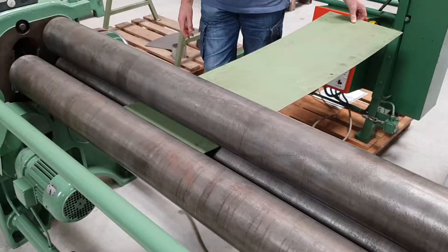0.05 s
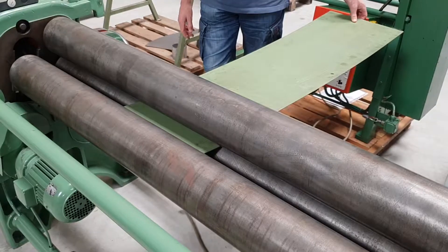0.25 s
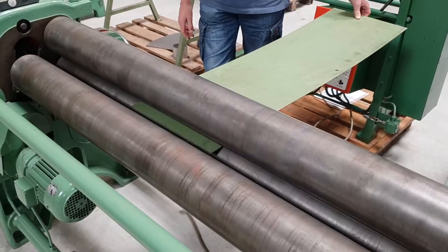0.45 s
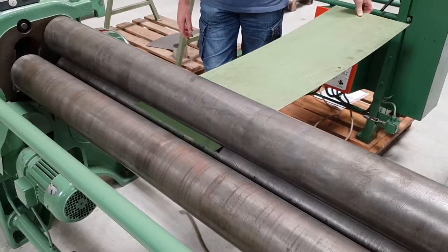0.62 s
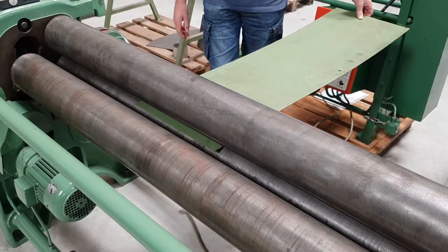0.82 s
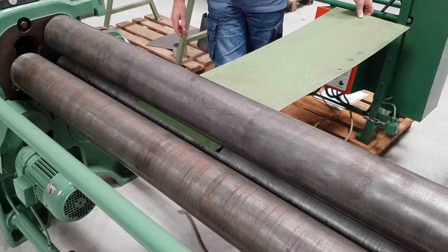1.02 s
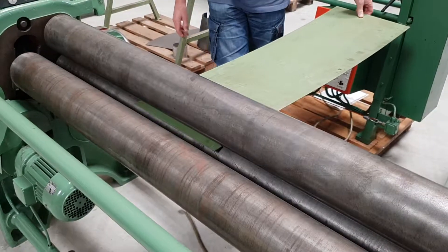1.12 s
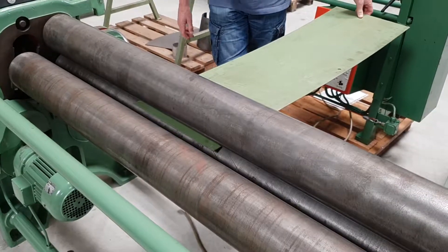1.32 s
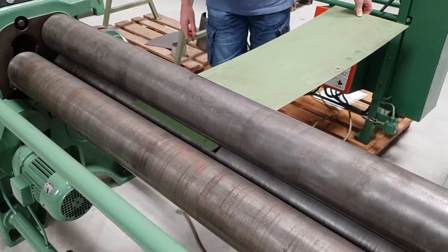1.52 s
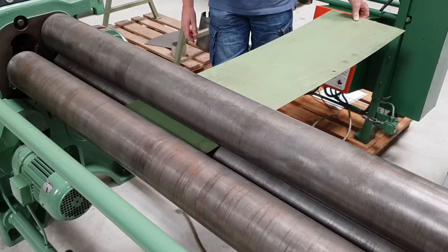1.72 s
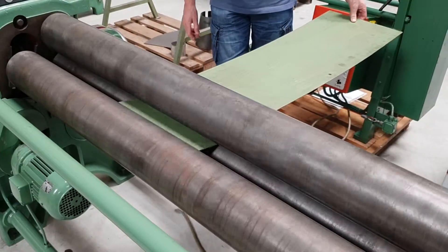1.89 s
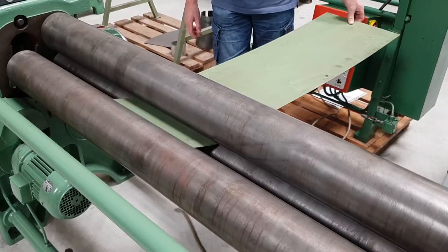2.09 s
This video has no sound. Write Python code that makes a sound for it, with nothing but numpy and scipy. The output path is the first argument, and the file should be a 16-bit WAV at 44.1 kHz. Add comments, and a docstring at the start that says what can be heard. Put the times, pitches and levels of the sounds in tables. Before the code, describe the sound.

A plate bending machine in a reverberant workshop, heard close in stereo: clack, gear rattle, short whine, hard stopping clunk with faint jingling, then an engaging clunk, high ping, motor hum and a brief plate groan.

```python
"""A steady room background, then a small clack and the gear rattle of a plate bending machine jogged in a
reverberant workshop. It whines briefly, stops with a clunk and loose parts jingle; it engages with another clunk,
thuds and a high ping, the motor hums on and the plate groans between the rolls.
Gears, clacks and clunks are shaped noise; steel, whine and hum are sines whose phase wanders.
Each source reaches two channels as direct sound, a ceiling echo and reverberation made from decaying noise."""
import sys
import numpy as np
from scipy import signal
from scipy.fft import rfft, irfft, next_fast_len
from scipy.io import wavfile
from scipy.ndimage import map_coordinates

SR = 44100
rng = np.random.default_rng(int(sys.argv[2]) if len(sys.argv) > 2 else 0)


def dump(signal):
    """Clip the signal to [-1, 1] and save it as 16-bit WAV at the path in sys.argv[1]."""
    limited = np.clip(np.atleast_2d(signal).T, -1, 1)
    pcm = np.round(limited * 32767).astype(np.int16)
    wavfile.write(sys.argv[1], SR, pcm)


N = 94815
T = np.arange(N) / SR

# Stopping clunk, a blow and its rebound: start_s, level_db, rise_s, t60_s
STOP_BLOWS = [(.614, -8.5, 0.006804, 0.050384), (.628, -18, 0.00282, 0.09645)]
# Engaging clunk, a blow and its rebound: start_s, level_db, rise_s, t60_s
ENGAGE_BLOWS = [(1.453, -12, 0.00695, 0.07471), (1.475, -18.5, 0.003309, .18)]


def amp(db):
    """Decibels to gain."""
    return 10 ** (np.asarray(db) / 20)


def unit(x):
    """Scale to rms 1."""
    return x / np.sqrt(np.mean(x ** 2) + 1e-20)


def along(points, hz):
    """Interpolate (frequency, value) points on a logarithmic frequency axis."""
    f, v = np.transpose(points)
    return np.interp(np.log(hz + 1), np.log(f + 1), v)


def level(rows):
    """Gain over time from (s, dB) points, inaudible before the first."""
    return amp(np.interp(T, *np.transpose(rows), left=-200))


def wobble(knots_per_s):
    """A smooth random curve through normally distributed knots."""
    knots = rng.standard_normal(int(N * knots_per_s / SR) + 4)
    return map_coordinates(knots, [T * knots_per_s])


def filtered(x, response):
    """Multiply the spectrum of x by a response of frequency, padded against wrap-around."""
    m = next_fast_len(N + SR // 2)
    hz = np.fft.rfftfreq(m, 1 / SR)
    return irfft(rfft(x, m) * response(hz), m)[..., :N]


def noise(colour, tilt_db=0):
    """Coloured noise of rms 1, tilted by dB per octave."""
    def response(hz):
        return amp(along(colour, hz) + tilt_db * np.log2(hz + 1))
    return unit(filtered(rng.standard_normal(N), response))


def diffuse(colour):
    """Stereo noise from all around: alike in the bass, unrelated in the treble."""
    # Likeness of the two channels: frequency_hz, correlation (no unit)
    likeness = [(100, 0.9491), (300, 0.9048), (600, 0.6441), (1000, -0.0241), (2000, -0.07974)]

    def response(hz):
        angle = np.arccos(np.clip(along(likeness, hz), -1, 1)) / 2
        return amp(along(colour, hz)) * [np.cos(angle), np.sin(angle)]
    mid, side = filtered(rng.standard_normal((2, N)), response)
    return unit(np.array([mid + side, mid - side]))


def decay(t, t60):
    """Exponential fall by 60 dB in t60 seconds."""
    return np.exp(-np.log(1000) * t / t60)


def blow(s, rise, t60):
    """Envelope of a blow at time s: a straight rise, then an exponential decay."""
    attack = np.clip((T - s) / rise, 0, 1)
    return attack * decay(np.maximum(T - s - rise, 0), t60)


def tone(hz, drift, knots_per_s, s=0):
    """A sine of rms 1, timed from s, whose phase wanders by drift radians rms at the knots."""
    return np.sqrt(2) * np.sin(2 * np.pi * hz * (T - s) + drift * wobble(knots_per_s))


def ring(modes, s, rise, drift=.8, knots_per_s=240):
    """Steel modes struck at time s, each decaying, their phase blurred by the chattering contact."""
    return sum(amp(db) * blow(s, rise, t60) * tone(hz, drift, knots_per_s, s) for hz, db, t60 in modes)


def hall(near_db, hall_db):
    """Stereo response of one place: scatter off the machine and the hall's long tail."""
    # Colour of the reverberation: frequency_hz, level_db
    colour = [(100, 1), (300, -2.5), (600, 0), (2000, 0), (3500, -2.5), (7000, 0), (13000, -3)]
    # Reverberation time of the hall: frequency_hz, t60_s
    tail_t60 = [(80, 1.6836), (250, 1.4009), (600, 1.5818), (1500, 1.6025), (4500, 1.5938), (7000, 1.1473),
                (10000, 0.7836), (14000, 0.5742)]
    near_t60_s, build_up_s = 0.07056, .0225
    air = diffuse(colour)
    near = air[:, ::-1] * decay(T, near_t60_s)  # reversed, so that scatter and tail differ
    hz, t, bands = signal.stft(air, SR, nperseg=256)
    fading = bands * decay(t, along(tail_t60, hz)[:, None])
    tail = signal.istft(fading, SR, nperseg=256)[1][:, :N] * np.minimum(T / build_up_s, 1)
    return amp(near_db) * near / np.linalg.norm(near[0]) + amp(hall_db) * tail / np.linalg.norm(tail[0])


def workshop(x, near_db, hall_db, pan_db, count=1):
    """Direct sound first at the right, a ceiling echo, and reverberation as contacts shift among count places."""
    left_lag_s, ceiling_s, ceiling_db = 0.00026114, .0225, -13
    shifts_per_s = 55  # knots a second of each place's share

    def direct_path(hz):
        arrival = np.exp(1j * np.pi * hz * left_lag_s * np.array([[-1], [1]]))
        echo = amp(ceiling_db) * np.exp(-2j * np.pi * hz * ceiling_s)
        return arrival * (1 + echo)
    direct = filtered(x, direct_path)
    shares = np.array([amp(10 * wobble(shifts_per_s)) for _ in range(count)])
    shares /= np.linalg.norm(shares, axis=0)  # constant total power
    wet = sum(signal.fftconvolve((share * x)[None], hall(near_db, hall_db), axes=1)[:, :N]
              for share in shares)
    pan = amp(pan_db * np.array([[.5], [-.5]]))  # positive: left louder
    return direct * pan + wet


def background():
    """Steady diffuse noise of the workshop."""
    # Colour of the background: frequency_hz, level_db
    colour = [(20, -30), (50, -5), (300, -6), (480, 2.5), (800, -3.5), (1200, -7), (2500, -8),
              (4200, -15.5), (6500, -31.5), (11000, -40)]
    return amp(-49.5) * diffuse(colour)


def clacks():
    """Short knocks of the linkage: noise bursts of differing brightness."""
    # Linkage clacks: start_s, level_db, rise_s, t60_s, tilt_db_per_octave
    knocks = [(.216, -26, 0.003658, 0.091, -1.133), (.324, -14, 0.008834, 0.12998, 0.451),
              (.592, -30.5, 0.002623, 0.0685, 1.5), (1.31, -38, 0.007457, 0.11824, -2),
              (1.442, -33, .005, .06, -0.5), (1.555, -17, 0.00602, 0.11503, -1),
              (1.817, -34.5, 0.003562, 0.12144, 1.4058)]
    # Their common colour: frequency_hz, level_db
    colour = [(60, -28.5), (300, -8), (900, -1), (2100, 2), (3500, -6), (5500, -8), (7200, -8.5),
              (9000, -18), (15000, -21.5)]
    return sum(amp(db) * blow(s, rise, t60) * noise(colour, tilt) for s, db, rise, t60, tilt in knocks)


def rattle():
    """Gear teeth batter through their play: noise roughened by dense, uneven swings of level."""
    # Rattle over time: time_s, level_db
    course = [(.22, -39.5), (.229, -15.5), (.27, -14.5), (.30, -15), (.335, -16), (.365, -29), (.42, -35),
              (.6, -41), (.63, -71)]
    # Its colour: frequency_hz, level_db
    colour = [(30, -59.5), (80, -31.5), (160, -6), (250, -0.5), (640, 3), (1400, -1.5), (2200, -.5),
              (4000, -9.5), (6500, -16), (9000, -30), (15000, -37)]
    rough_db, knots_per_s = 2.5, 420
    return level(course) * unit(noise(colour) * amp(rough_db * wobble(knots_per_s)))


def motor():
    """The gears churn as uneven noise; the motor's unsteady hum joins from the engaging blow."""
    # Strength of the drive over time: time_s, level_db
    run = [(.23, -7.5), (.4, 0.5), (.62, 1.5), (.72, -5), (1.0, -11.5), (1.43, -18), (1.5, -0.5), (1.62, 2),
           (1.9, -3), (2.15, -0.5)]
    # Hum of the motor: frequency_hz, level_db
    hum_lines = [(144, -55.5), (286, -44), (361, -45.5), (597, -50.5), (720, -50), (1297, -51)]
    # Colour of the gears: frequency_hz, level_db
    gear_colour = [(30, -22.5), (70, -8), (150, -1.5), (320, 1), (480, -1.5), (750, 0), (1100, -6.5),
                   (2000, -7), (3000, -17), (6000, -27.5), (10000, -37.5)]
    waver_db, grind_db, gear_db = 3, 2, -37
    hum = sum(amp(db + waver_db * wobble(14)) * tone(hz, drift=1.0411, knots_per_s=30)
              for hz, db in hum_lines)
    gears = unit(noise(gear_colour) * amp(grind_db * wobble(70)))
    engaged = T > ENGAGE_BLOWS[0][0]
    return level(run) * (hum * engaged + amp(gear_db) * gears)


def whine():
    """The drive sings in several steady pitches during the short jog, with a rough flutter."""
    # Whine over time: time_s, level_db
    course = [(.24, -29), (.33, -2.5), (.42, 0.5), (.605, -1), (.64, -44)]
    # Its pitches: pitch_hz, level_db
    lines = [(484.5, -40), (646, -26), (1265, -37), (1297, -36), (2510, -48), (2590, -45.5)]
    flutter_db, flutter_knots_per_s = 1.3109, 110.23
    return level(course) * sum(
        amp(db + flutter_db * wobble(flutter_knots_per_s)) * tone(hz, drift=0.217, knots_per_s=50)
        for hz, db in lines)


def clunk(blows, colour, modes):
    """A heavy chattering contact, its rebound and the steel that they ring."""
    rough_db, knots_per_s = 2, 200
    crash = unit(noise(colour) * amp(rough_db * wobble(knots_per_s)))
    return sum(amp(db) * (blow(s, rise, t60) * crash + ring(modes, s, rise)) for s, db, rise, t60 in blows)


def stop_clunk():
    """The drive stops: broad noise over short-lived steel modes."""
    # Colour of the contact: frequency_hz, level_db
    colour = [(40, -37), (150, -9), (450, -1.5), (700, -4.5), (1200, 1), (3200, -1.5), (4400, 0),
              (6100, -10), (6900, -4.5), (7350, -6.5), (8200, -18), (14000, -20), (16000, -37)]
    # Ringing steel parts: pitch_hz, level_db, t60_s
    modes = [(967.12, -10.5, 0.03223), (1285.2, -11.5, .04), (1859.3, -14, 0.03156), (2464, -14.5, .03),
             (3900, -10, 0.083), (4732.3, -13, 0.0414), (6970, -12, 0.034)]
    return clunk(STOP_BLOWS, colour, modes)


def jingle():
    """Loose steel parts tick at scattered pitches, on the whole ever more faintly, after the stop."""
    level_db, fall_db_per_s, spread_s = -32, 31, 0.72
    middle_hz, t60_s = 3388.9, .06
    out = np.zeros(N)
    for when, pitch, size in rng.random((24, 3)):
        delay = when * spread_s
        s = STOP_BLOWS[-1][0] + delay
        hz = middle_hz * 2 ** (1.5 * (pitch - .5))  # within 0.75 octave either way
        gain = size * amp(level_db - fall_db_per_s * delay)
        out += gain * blow(s, .001, t60_s) * np.sin(2 * np.pi * hz * T)
    return out


def thuds():
    """The frame booms in decaying low to middle tones as it sheds or takes up the load."""
    # Thuds of the frame: start_s, level_db, rise_s, t60_s, pitch_hz
    booms = [(.667, -31.5, 0.00924, 0.077, 810), (1.52, -24.5, 0.01208, 0.12037, 410.9),
             (1.531, -31, 0.014, 0.2211, 240.5), (1.58, -37, 0.02483, .3, 115)]
    return sum(amp(db) * blow(s, rise, t60) * tone(hz, drift=0.9373, knots_per_s=70)
               for s, db, rise, t60, hz in booms)


def engage_clunk():
    """The drive engages: broad noise over longer-ringing steel modes."""
    # Colour of the contact: frequency_hz, level_db
    colour = [(40, -44.5), (170, -12.5), (280, -2), (450, 0.5), (850, 2.5), (1050, -4), (1450, 1),
              (2400, -1.5), (3200, -5.5), (4200, -2.5), (6000, -12.5), (9500, -22), (14000, -12),
              (16000, -25.5)]
    # Ringing steel parts: pitch_hz, level_db, t60_s
    modes = [(419.85, -16, 0.2717), (708.33, -17.5, 0.3162), (839.97, -15.5, 0.287), (1391.4, -14, .1),
             (4016, -11.5, .1), (4205, -8.5, 0.11966)]
    return clunk(ENGAGE_BLOWS, colour, modes)


def ping():
    """A small steel part rings in a tight cluster of very high modes."""
    # The stroke: start_s, level_db, rise_s, t60_s (the last unused, each mode has its own)
    stroke = (1.4911, -12.5, 0.0002, .14)
    # Modes of the part: pitch_hz, level_db, t60_s
    modes = [(12162, -15.5, .2), (12648, -13, 0.2446), (12760, -2, 0.2124), (12839, -0.5, 0.2272)]
    s, db, rise, _ = stroke
    return amp(db) * ring(modes, s, rise)


def groan():
    """The plate sticks and slips a few times, scraping and ringing at each slip."""
    # Slips of the plate on the rolls: start_s, level_db
    slips = [(1.827, -33), (1.8375, -22), (1.8485, -21), (1.8575, -21.5)]
    # Modes of the plate: pitch_hz, level_db, t60_s
    modes = [(611.9, -2.5, 0.06733), (665.54, 0, 0.04761), (826.3, -12.5, 0.0419), (1509.7, -9, 0.04446),
             (1848.3, -11, .03), (2559.3, -13, 0.02654)]
    # Colour of the scrape: frequency_hz, level_db
    scrape_colour = [(200, -18.5), (800, 0), (2600, 0.5), (3500, -19), (10000, -31.5)]
    scrape_db, scrape_t60_s = -10.5, 0.0516
    rub = amp(scrape_db) * noise(scrape_colour)
    out = np.zeros(N)
    for s, db in slips:
        plate = ring(modes, s, rise=.002, drift=0.4016, knots_per_s=200)
        out += amp(db) * (plate + rub * blow(s, 0.0018, scrape_t60_s))
    return out


def scene():
    """All parts of the machine in the hall, over the steady background."""
    return (background()
            + workshop(clacks() + jingle(), near_db=-2.5, hall_db=-10, pan_db=-3)
            + workshop(rattle(), near_db=-3, hall_db=-10, pan_db=-3.5, count=3)
            + workshop(motor(), near_db=-7, hall_db=-6, pan_db=1.0)
            + workshop(whine(), near_db=-17, hall_db=-14.5, pan_db=2.5)
            + workshop(stop_clunk(), near_db=-4.5, hall_db=-11.5, pan_db=-1.0, count=2)
            + workshop(engage_clunk() + thuds(), near_db=-7.5, hall_db=-8.5, pan_db=-.5)
            + workshop(ping(), near_db=-5.5, hall_db=-9.0, pan_db=0)
            + workshop(groan(), near_db=-16, hall_db=-15, pan_db=2.0))


def record(dry):
    """The microphone signal clips at full scale, then a steep low-pass halves it at the band limit."""
    top_hz = 15900
    return filtered(np.clip(dry, -1, 1), lambda hz: 1 / (1 + (hz / top_hz) ** 120))


dry = scene()
out = record(dry)
dump(out)
```